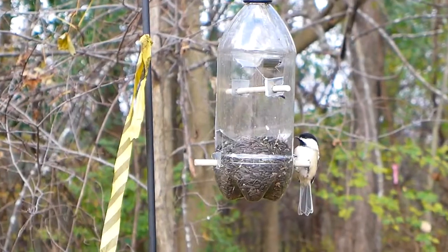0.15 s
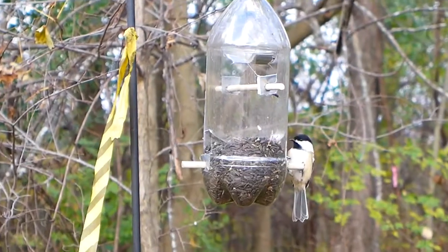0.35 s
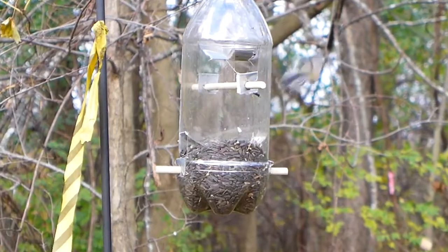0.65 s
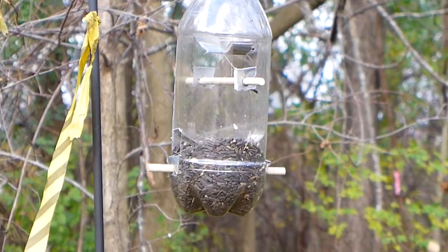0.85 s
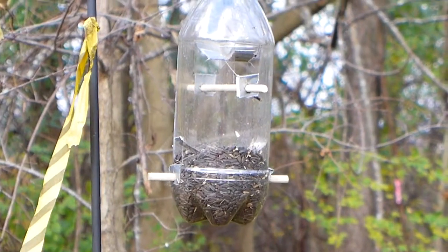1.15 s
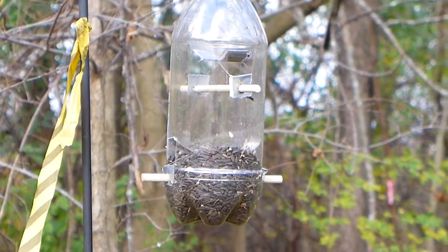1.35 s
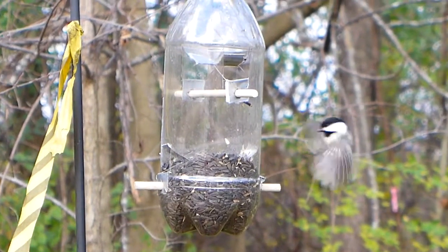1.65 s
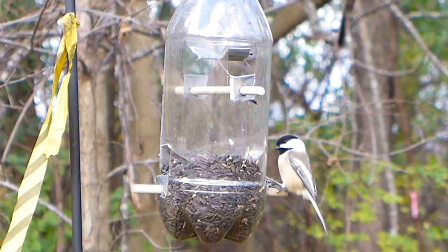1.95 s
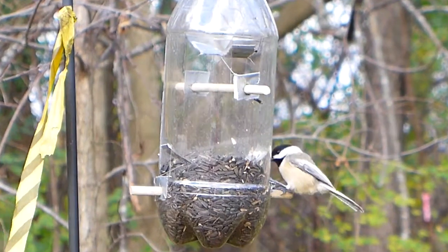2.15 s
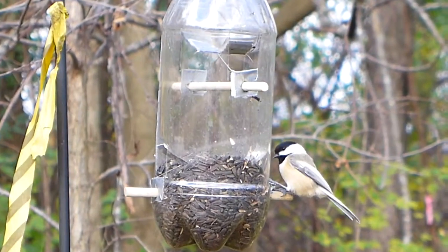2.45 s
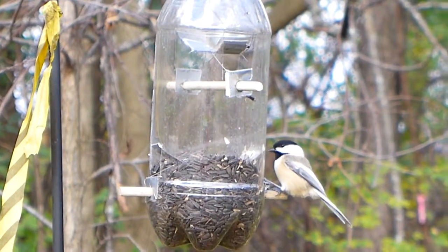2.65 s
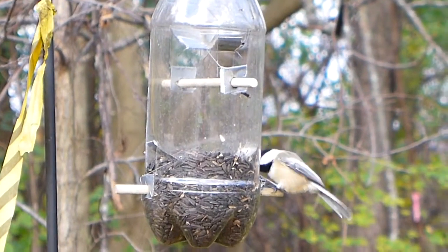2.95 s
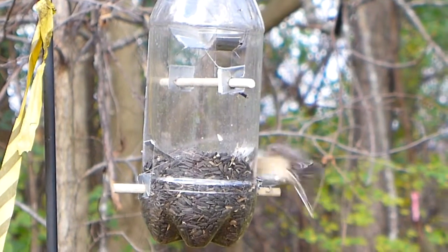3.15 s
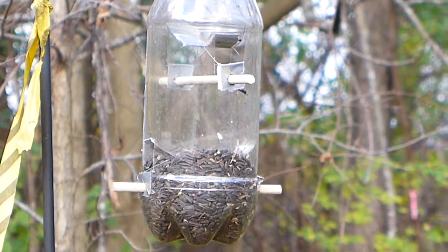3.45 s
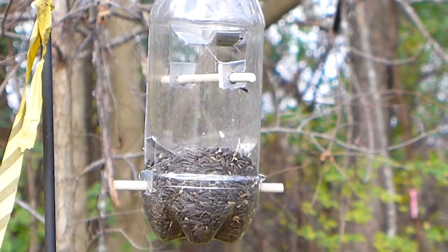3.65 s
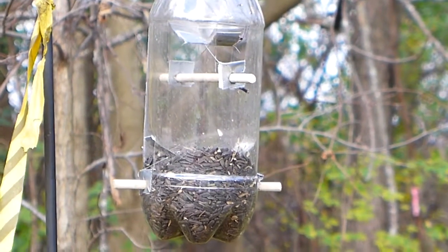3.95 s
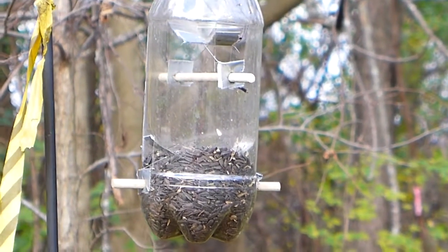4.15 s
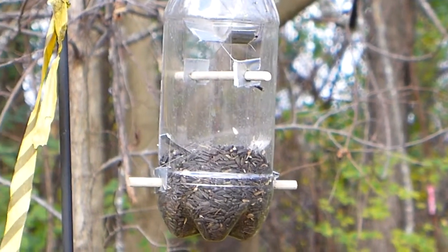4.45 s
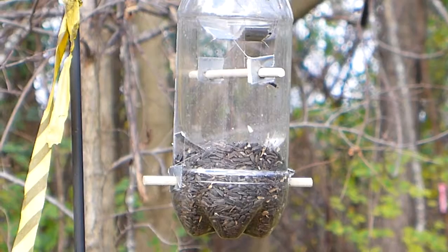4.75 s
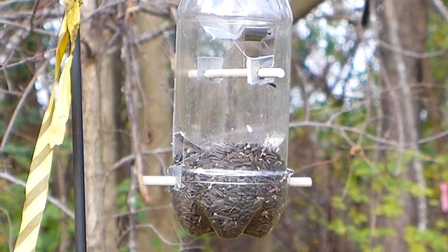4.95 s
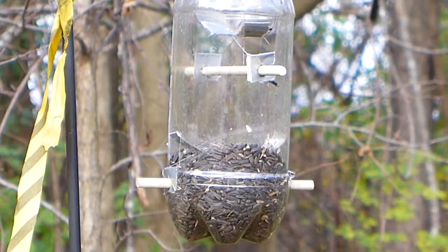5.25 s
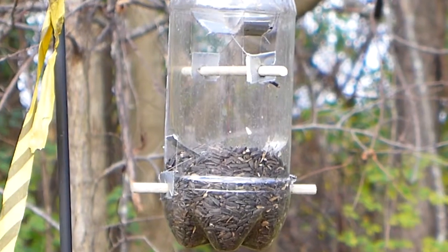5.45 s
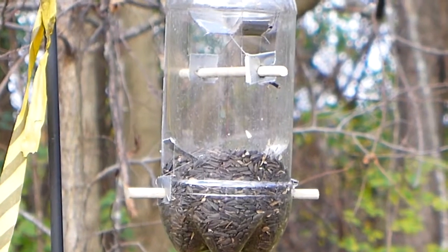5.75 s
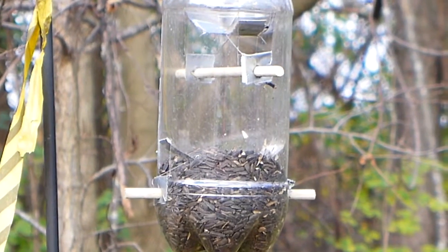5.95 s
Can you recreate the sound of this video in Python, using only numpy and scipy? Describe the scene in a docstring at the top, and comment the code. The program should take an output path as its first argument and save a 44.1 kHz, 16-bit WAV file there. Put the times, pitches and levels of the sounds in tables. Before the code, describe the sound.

Small birds whistle, chirp and rasp at a woodland feeder while the seed-filled bottle knocks and clicks over a faint, wavering outdoor hum and hiss.

```python
"""Chickadees at a hanging feeder

Chickadees call at a wood's edge: thin and arched whistles and two-voiced buzzes are gliding near sines,
harsh dees are harmonic stacks roughened by noise. A further bird's nasal note is a stack too.
Far caws are noise-shaken tones, feeder knocks are decaying modes with noise, rustles are grainy noise.
Trees scatter the calls back over drifting noise: a distant town hum and the hiss of a small camera."""
import sys
import numpy as np
from scipy import signal
from scipy.fft import rfft, irfft
from scipy.io import wavfile
from scipy.ndimage import uniform_filter1d

SR = 44100
rng = np.random.default_rng(int(sys.argv[2]) if len(sys.argv) > 2 else 0)


def master_out(mix):
    """Clip the mix to full scale and print it as 16-bit PCM to the path in sys.argv[1]."""
    frames = np.transpose(np.atleast_2d(mix))
    ceiling = np.clip(frames, -1, 1)
    pcm = np.round(ceiling * 32767).astype(np.int16)
    wavfile.write(sys.argv[1], SR, pcm)


N = 269010  # samples


def undb(db):
    """Decibels to gain."""
    return 10 ** (np.asarray(db) / 20)


def level(x, db):
    """Scale to an rms level."""
    return x * undb(db) / np.sqrt(np.mean(x ** 2))


def read(points, hz):
    """Read a (pitch_hz, level_db) table on a log-frequency axis."""
    f, db = np.transpose(points)
    return np.interp(np.log(np.maximum(hz, 1)), np.log(f), db)


def walk(rate, size=N):
    """Smooth random motion with about rate turns a second; spread near 1."""
    k = max(int(SR / rate), 1)
    twice_smoothed = uniform_filter1d(uniform_filter1d(rng.standard_normal(size), k), k)
    return np.sqrt(1.66 * k) * twice_smoothed


def coloured(gain):
    """Noise whose spectrum is gain(Hz)."""
    hz = np.arange(N // 2 + 1) * SR / N
    return irfft(rfft(rng.standard_normal(N)) * gain(hz), N)


def bright_noise(size):
    """Noise between 4 and 11 kHz, for breath and cracks."""
    band = signal.butter(2, [4000, 11000], "bandpass", fs=SR, output="sos")
    return signal.sosfilt(band, rng.standard_normal(size))


def fading(t, t60):
    """Exponential decay by 60 dB in t60 seconds."""
    return np.exp(-np.log(1000) * t / t60)


def unroll(table):
    """The samples that a note covers, and its columns joined by straight lines."""
    s, *columns = np.transpose(table)
    at = np.arange(int(s[0] * SR), min(int(s[-1] * SR), N))
    return at, [np.interp(at / SR, s, c) for c in columns]


def clock(length):
    """Half-millisecond steps through a note."""
    return np.arange(0, length, .0005)


def air():
    """Town hum and hiss: noise in octave bands that drift alone, plus a few wavering hum bands."""
    # spectrum of the air before overall scaling: pitch_hz [Hz], density_db [relative dB per Hz]
    air_colour = [(15, -63), (25, -12), (43, -22.5), (154, -11), (181, -6), (462, -2.5), (501, -6.5),
                  (573, -2.5), (729, -8.5), (1060, -9.5), (1460, -19.5), (1960, -20.5), (3260, -27.5),
                  (4150, -23), (15000, -26.5)]
    # stereo spread of the air: pitch_hz [Hz], side_minus_mid_db [dB]
    air_width = [(60, -13.5), (110, -15.5), (200, -10.5), (380, -10.5), (700, -4), (1290, 3.5), (2380, 3),
                 (4400, -0.5), (8120, -2.5), (15000, -3)]
    # hum bands: centre_hz [Hz], width_hz [Hz], level_db [dB rms before wavering]
    hum_bands = [(567.5, 34, -71), (682.5, 29, -66.5), (1047, 58, -67.5), (193.5, 66, -74.5),
                 (1357, 22, -78.5)]
    out = 0
    for centre_hz in 22 * 2. ** np.arange(10):
        # neighbouring octaves crossfade
        share = lambda hz: np.cos(np.pi / 2 * np.clip(np.log2(np.maximum(hz, 1) / centre_hz), -1, 1))
        mid = coloured(lambda hz: share(hz) * undb(read(air_colour, hz)))
        side = coloured(lambda hz: share(hz) * undb(read(air_colour, hz) + read(air_width, hz)))
        # the treble drifts less
        drift_db = (2.3 * walk(3.4) + 1.5 * walk(20)) * min(1, 800 / centre_hz) ** 0.45
        out = out + undb(drift_db) * np.array([mid + side, mid - side])
    out = level(out, -53)
    for f, width, db in hum_bands:
        hum = level(coloured(lambda hz: 1 / (1 + ((hz - f) / width * 2) ** 2)), db)
        out += hum * undb(3.25 * walk(11.3))
    return out


def crow():
    """Distance smears each caw into a rough band: noise shakes a tone gliding in pitch and level."""
    # far caws: start_s [s], length_s [s], start_hz [Hz], middle_hz [Hz], end_hz [Hz], level_db [dB]
    caws = [(0.225, 0.39, 1522, 1600, 1556, -62.5), (1.012, 0.43, 1385, 1520, 1575, -60),
            (2.382, 0.67, 1554, 1542, 1536, -59.5), (3.648, .68, 1480, 1676, 1390, -59.5)]
    out = np.zeros(N)
    for s, length, start_hz, middle_hz, end_hz, db in caws:
        at, (hz, caw_db) = unroll([(s, start_hz, db - 5.5), (s + 0.27 * length, middle_hz, db),
                                   (s + length, end_hz, db - 6.5)])
        tone = np.sin(2 * np.pi * np.cumsum(hz) / SR)
        edge = np.hanning(len(at)) ** 0.082
        out[at] = undb(caw_db) * edge * walk(342, size=len(at)) * tone
    return out


def stacks(notes, throat, jitter, blur_hz, focus_hz, focus_width):
    """Harmonics through a throat and a beak resonance; roughness turns each line into a noisy band."""
    out = np.zeros(N)
    for note in notes:
        at, (hz, db, rough, focus_db) = unroll(note)
        pitch = uniform_filter1d(hz, size=600) * (1 + jitter * walk(60, size=len(at)))
        phase = 2 * np.pi * np.cumsum(pitch) / SR
        voice = 0
        for k in range(2, 24):
            noisy = np.clip(rough * (k / 8) ** 0.77, 0, 1)  # upper lines blur more
            shake = np.sqrt(1 - noisy) + np.sqrt(noisy) * walk(blur_hz, size=len(at))
            beak_db = focus_db * np.exp(-((k * hz - focus_hz) / focus_width) ** 2)
            # each line waxes and wanes alone
            gain_db = read(throat, k * hz) + beak_db + 1.5 * walk(30, size=len(at))
            line = np.sin(k * phase + rng.uniform(0, 2 * np.pi))
            voice = voice + undb(gain_db) * shake * line
        # even out the voice so that the note's own level curve rules
        out[at] += undb(db) * voice / np.sqrt(uniform_filter1d(voice ** 2, size=1500))
    return out


def nasal_note():
    """A further bird's nasal note: a pulsed stack of harmonics that swells and dies."""
    # points along each note: time_s [s], pulse_rate_hz [Hz], level_db [dB], roughness [0-1], beak_focus_db [dB]
    nasal_path = [
        [(0.51, 456, -67, 0.35, -7.5), (0.536, 482, -50, 0.5, 3), (0.554, 494, -46, 0.7, 5.5),
         (0.582, 472, -46, 0.5, 2), (0.6, 446, -54, 0.5, -2), (0.625, 454, -66, 0.4, -6)],
    ]
    # throat response: pitch_hz [Hz], level_db [dB]
    nasal_throat = [(710, -64.5), (1200, -13), (1950, -3), (2200, -4.5), (2930, -7.5), (4000, -25),
                    (5200, -35), (8800, -120)]
    return stacks(nasal_path, nasal_throat, jitter=0.0033, blur_hz=310, focus_hz=2800, focus_width=240)


def feeder(ring_t60, rattle_db, rattle_t60, crack_t60):
    """Each knock rings the loaded bottle's main and upper modes, rattles the seed, and cracks."""
    # knocks: start_s [s], ring_db [dB], ring_hz [Hz], crack_db [dB], left_minus_right_db [dB]
    knock_table = [(0.557, -38.5, 720, -36, 0), (0.876, -40, 490, -51, -8), (1.44, -21, 387, -35.5, -5.5),
                   (1.481, -45, 626, -37.5, -10), (1.592, -57, 454, -45, 3), (1.659, -40, 356, -64.5, -2),
                   (1.798, -40, 510, -49, 0), (2.292, -46.5, 665, -53, -1), (3.163, -25, 647, -35, -1.5),
                   (3.221, -42, 2300, -44.5, -1), (3.246, -47, 810, -38, 4),
                   (3.255, -34, 2130, -36.5, -3.5), (3.655, -50, 223, -51, -2), (4.641, -54, 252, -62, -2),
                   (4.939, -25.5, 376, -44, -5), (5.05, -33.5, 360, -56, -5.5), (6.051, -53, 995, -43, -2)]
    # upper modes of the bottle: pitch_hz [Hz], level_db [dB against the main ring], t60_s [s]
    upper_modes = [(1220, -14.5, 0.013), (2110, -16.5, 0.025), (4970, -14, 0.017)]
    out, t = np.zeros((2, N + SR // 10)), np.arange(SR // 10) / SR
    upper = sum(undb(db) * np.sin(2 * np.pi * hz * t) * fading(t, t60) for hz, db, t60 in upper_modes)
    for s, db, hz, crack_db, pan_db in knock_table:
        ring = np.sin(2 * np.pi * hz * t) * fading(t, ring_t60)
        rattle = undb(rattle_db) * walk(3500, size=len(t)) * fading(t, rattle_t60)
        crack = undb(crack_db) * bright_noise(len(t)) * fading(t, crack_t60)
        knock = undb(db) * (ring + upper + rattle) + crack
        start = int(s * SR)
        out[:, start:start + len(t)] += knock * undb([[pan_db / 2], [-pan_db / 2]])
    # the camera passes little deep bass from the knocks
    return signal.sosfilt(signal.butter(4, 140, "highpass", fs=SR, output="sos"), out[:, :N])


def whistles(notes, overtone_db, overtone_fall_db, flutter, flutter_hz, breath, hiss_db, octave_blur):
    """Near sines, the octave fading as pitch climbs; level beats and pitch wavers; breath blurs them."""
    out = np.zeros(N)
    air_jet = bright_noise(N)
    for note in notes:
        at, (hz, db) = unroll(note)
        edge = np.clip(np.minimum(at - at[0], at[-1] - at) / (0.00064 * SR), 0, 1)
        phase = 2 * np.pi * np.cumsum(uniform_filter1d(hz, size=40)) / SR
        flutter_phase = 2 * np.pi * np.cumsum(flutter_hz * (1 + .12 * walk(130, size=len(at)))) / SR
        phase = phase + 2.0 * flutter * np.cos(flutter_phase)  # the pitch wavers in step with the level
        beat = 1 + flutter * np.sin(flutter_phase) + breath * walk(5000, size=len(at))
        octave_gain = undb(overtone_db - overtone_fall_db * np.log2(hz / 5000))
        octave = octave_gain * np.sin(2 * phase) * (1 + octave_blur * walk(1500, size=len(at)))
        tone = np.sqrt(2) * undb(db) * beat * (np.sin(phase) + octave)
        # the jet of breath swells less than the tone
        hiss = undb(hiss_db + 0.37 * db) * air_jet[at]
        out[at] += edge * (tone + hiss)
    return out


def seet(s, length, start_hz, held_hz, end_hz, glide, droop, early_db, mid_db, late_db):
    """The pitch glides to its held value and droops ever faster at the end."""
    attack_s, release_s, edge_db, shoulder_db = 0.011, 0.0043, -15, -5.5
    t = clock(length)
    pitch = held_hz - (held_hz - start_hz) * np.exp(-t / glide)
    pitch = pitch - (held_hz - end_hz) * np.maximum(1 - (length - t) / droop, 0) ** 2
    marks = [0, attack_s, .27 * length, length / 2, 0.84 * length, length - release_s, length]
    db = np.interp(t, marks, [early_db + edge_db, early_db + shoulder_db, early_db, mid_db,
                              late_db, late_db + shoulder_db, late_db + edge_db])
    return np.c_[s + t, pitch, db]


def seets():
    """Thin, nearly pure whistles with little flutter or breath."""
    # seet notes: start_s [s], length_s [s], start_hz [Hz], held_hz [Hz], end_hz [Hz], glide_s [s],
    # droop_s [s], early_db [dB], midway_db [dB], late_db [dB]
    seet_table = [(0.56, 0.057, 5600, 8440, 3400, .0095, 0.014, -29.5, -35, -27),
                  (0.583, 0.031, 6700, 6400, 6200, .008, 0.0083, -34, -40, -30),
                  (2.659, 0.072, 7830, 8760, 7700, .009, .024, -34, -31, -44),
                  (2.665, 0.069, 7400, 7150, 5700, 0.013, 0.05, -45, -30.5, -34),
                  (4.918, 0.0542, 6360, 7200, 6900, 0.011, 0.022, -53, -58, -55),
                  (5.011, 0.11, 7550, 9027, 8810, 0.015, 0.008, -34, -30, -33),
                  (5.036, 0.048, 7700, 7740, 7600, .01, .015, -43, -53.5, -48)]
    return whistles([seet(*c) for c in seet_table], overtone_db=-27, overtone_fall_db=32, flutter=.04,
                    flutter_hz=300, breath=.03, hiss_db=-52, octave_blur=1.2)


def chirp(s, held, hz, ease_hz, octave_s, early_db, mid_db, late_db):
    """The pitch leaps, eases up to its top, then plunges; the beak favours the top."""
    # low pitches leave the beak weakly: pitch_hz [Hz], level_db [dB]
    beak = [(2000, -32), (3100, -28), (4200, -17), (5200, -5.5), (6400, -3)]
    foot_hz, rise_s, ease_s, early_s, start_db = 3050, .0025, .012, .011, -11
    t = clock(held + .02)
    climb = hz - ease_hz * np.exp(-t / ease_s) - (hz - ease_hz - foot_hz) * np.exp(-t / rise_s)
    plunge = 2 ** (-np.maximum(t - held, 0) / octave_s)
    pitch = uniform_filter1d(climb * plunge, size=8, mode="nearest")
    effort_db = np.interp(t, [0, early_s, (early_s + held) / 2, held],
                          [early_db + start_db, early_db, mid_db, late_db])
    sounding = (pitch > foot_hz) | (t < held)
    return np.c_[s + t, pitch, effort_db + read(beak, pitch)][sounding]


def chirps():
    """Arched whistles whose level beats quickly, with a blurred octave."""
    # chirps: start_s [s], time_until_drop_s [s], top_hz [Hz], slow_last_climb_hz [Hz],
    # octave_drop_s [s], early_db, midway_db, late_db [dB before the beak]
    chirp_table = [(0.668, 0.037, 7970, 2720, 0.0047, -17, -21.5, -21.5),
                   (0.758, 0.031, 7020, 811, 0.0089, -18, -18, -21.5),
                   (0.844, .030, 7440, 1677, 0.01, -16.5, -28, -19.5),
                   (0.941, .032, 7430, 1410, 0.0089, -16.5, -20.5, -20),
                   (1.032, .033, 7280, 1810, .008, -23, -21, -23),
                   (1.13, .035, 7190, 1870, 0.0073, -24.5, -22, -24)]
    return whistles([chirp(*c) for c in chirp_table], overtone_db=-16, overtone_fall_db=42, flutter=0.21,
                    flutter_hz=127.6, breath=0.091, hiss_db=-48, octave_blur=0.7)


def dee(s, length, top_hz, sag, db, rough, focus_db):
    """A rough start climbs and clears; then the rate sags as level, roughness and beak focus grow."""
    start_share, rise_s, droop_s, droop_hz = .76, .022, 0.0386, 25
    attack_s, settle_s, release_s, swell_db = 0.016, 0.033, .011, 3
    t = clock(length)
    rate = top_hz * (1 - (1 - start_share) * np.exp(-t / rise_s)) - sag * t
    rate -= droop_hz * np.maximum(1 - (length - t) / droop_s, 0) ** 2
    marks = [0, attack_s, settle_s, length - release_s, length]
    shape_db = np.interp(t, marks, [-22, -6.5, -swell_db / 2, swell_db / 2, -20])
    roughness = np.interp(t, marks[1:4], [.55, rough, rough + .18])
    focus = focus_db - 3 * np.maximum(1 - t / marks[3], 0)
    return np.c_[s + t, rate, db + shape_db, roughness, focus]


def dees():
    """Harsh notes: fast pulses heard as a stack of noisy harmonics."""
    # dee notes: start_s [s], length_s [s], top_pulse_rate_hz [Hz], sag_hz_per_s [Hz/s],
    # level_db [dB], roughness [0-1], beak_focus_db [dB]
    dee_table = [(1.269, 0.19, 522.3, 129.3, -39.5, 0.46, 8.5), (2.778, 0.17, 491, 189.5, -40, .2, 5),
                 (3.001, 0.19, 493.6, 152, -39.5, 0.19, 6.5), (3.231, 0.19, 511.4, 195.7, -41, 0.24, 4.5),
                 (5.841, .186, 525.5, 108.3, -34.5, 0.4, 7.5), (6.061, .19, 520, 110, -34, .35, 7.5)]
    # throat response: pitch_hz [Hz], level_db [dB]
    dee_throat = [(760, -39), (1300, -27.5), (1980, -14), (2570, -20.5), (2760, -11.5), (3240, -9),
                  (3500, -6.5), (4080, -4.5), (4970, -8), (5790, -15.5), (6580, -24), (10000, -34.5),
                  (13000, -35), (22000, -120)]
    return stacks([dee(*c) for c in dee_table], dee_throat, jitter=0.0035, blur_hz=640,
                  focus_hz=3850, focus_width=470)


def rustle():
    """Grainy broad noise of feathers and leaves, swelling and fading."""
    # rustles: loudest_s [s], rise_s [s], hold_s [s], level_db [dB], fade_db_per_s [dB/s]
    rustle_table = [(1.473, 0.022, .001, -56.5, 84.5), (2.286, .066, 0.0071, -54, 902),
                    (4.937, .004, 0.098, -58, 430)]
    # spectrum before scaling: pitch_hz [Hz], density_db [relative dB per Hz]
    rustle_colour = [(1500, -4), (5000, 12.5), (8000, 5.5), (11000, 8), (15000, -2)]
    range_db = 28.5
    out = np.zeros(N)
    grain = level(coloured(lambda hz: undb(read(rustle_colour, hz))), 2.3) * undb(1.2 * walk(200))
    for s, rise, hold, top_db, fade in rustle_table:
        low_db = top_db - range_db
        at, (db,) = unroll([(s - rise, low_db), (s, top_db), (s + hold, top_db),
                            (s + hold + range_db / fade, low_db)])
        out[at] = undb(db) * grain[at]
    return out


def rasp(s, creep, hold, start_hz, shelf_hz, top_hz, db):
    """Creeps up to a shelf while swelling, jumps to the top, holds, and stumbles out."""
    # the stumble: after_hold_s [s], share_of_top_pitch [ratio], level_db [dB against the top]
    stumble = [(.005, 1, -18), (.01, 1, -4), (.013, .88, -22), (.02, .82, -34)]
    top = s + creep + 0.0051  # the jump lasts 5.1 ms
    end = top + hold
    return [(s, start_hz, db - 25),
            (s + creep / 2, start_hz + 0.7 * (shelf_hz - start_hz), db - 7.5),
            (s + creep, shelf_hz, db - 1.5),
            (top, top_hz, db),
            (end, top_hz, db),
            *[(end + late, share * top_hz, db + tail_db) for late, share, tail_db in stumble]]


def rasps():
    """Rough voice of the buzzy notes: fast deep flutter and much breath."""
    # rasps: start_s [s], creep_s [s], hold_at_top_s [s], start_hz [Hz], shelf_hz [Hz], top_hz [Hz], level_db [dB]
    rasp_table = [(5.572, 0.014, 0.015, 4240, 5000, 7260, -27.5),
                  (5.658, .022, 0.0012, 3496, 5100, 6240, -27),
                  (5.748, 0.026, .001, 3813, 5010, 5740, -25.5)]
    return whistles([rasp(*c) for c in rasp_table], overtone_db=-43, overtone_fall_db=6, flutter=0.39,
                    flutter_hz=479.4, breath=0.32, hiss_db=-28, octave_blur=.7)


def sweep(s, hold, top_hz, db):
    """A peaked sweep up and down, louder the higher it is."""
    foot_hz, rise_s, fall_s, rise_bend, fall_bend, db_per_octave = 2092, 0.017, 0.014, 1.6, 3.4, 26.5
    t = clock(rise_s + hold + fall_s) - rise_s
    climb = np.clip(1 + t / rise_s, 0, 1) ** rise_bend
    fall = np.clip(1 - (t - hold) / fall_s, 0, 1) ** fall_bend
    pitch = foot_hz + (top_hz - foot_hz) * uniform_filter1d(climb * fall, size=6)
    return np.c_[s + t, pitch, db + db_per_octave * np.log2(pitch / top_hz)]


def sweeps():
    """Clear voice of the buzzy notes: light flutter and some breath."""
    # sweeps: crest_s [s], hold_before_drop_s [s], crest_hz [Hz], level_db [dB]
    sweep_table = [(5.599, 0.0098, 6410, -20), (5.689, 0.00097, 5950, -18.5), (5.783, 0.0019, 5273, -23)]
    return whistles([sweep(*c) for c in sweep_table], overtone_db=-20, overtone_fall_db=23.5, flutter=0.086,
                    flutter_hz=430, breath=0.15, hiss_db=-44.5, octave_blur=0.2)


def trees(x, wet_db, t60, late_db, late_t60):
    """Near trunks send back a quick scatter, the far wood a longer one; a different one to each side."""
    t = np.arange(SR // 2) / SR
    fade = fading(t, t60) + undb(late_db) * fading(t, late_t60)
    fade = fade * np.minimum(t / 0.0081, 1)  # the scatter builds up over 8.1 ms
    shared, own = rng.standard_normal(len(t)), rng.standard_normal((2, len(t)))
    echo = undb(wet_db) * fade * (shared + 0.708 * own) / np.sqrt(np.sum(fade ** 2))
    # leaves swallow the highest pitches
    echo = signal.sosfilt(signal.butter(1, 9000, fs=SR, output="sos"), echo)
    return x + signal.fftconvolve(x[None], echo, axes=1)[:, :N]


def scene():
    """Birds through the trees, a little to the right with caws and rustles, over the feeder and the air."""
    thin = seets() + chirps() + rasps() + sweeps()
    harsh = nasal_note() + dees()
    heard = trees(thin, wet_db=-7.5, t60=0.031, late_db=-12.0, late_t60=0.3)
    heard += trees(harsh, wet_db=-9, t60=.1, late_db=-15.5, late_t60=0.4)
    heard += crow() + rustle()
    knocks = feeder(ring_t60=0.02, rattle_db=-9.5, rattle_t60=0.023, crack_t60=0.014)
    # left and right gains in dB
    return heard * undb([[-.7], [.7]]) + knocks + air() * undb([[-.4], [.4]])


def record(dry):
    """The camera dulls and then cuts the top, and sits slightly off zero."""
    top_hz, offset = 15600, -.003
    dull = signal.sosfilt(signal.butter(2, 14000, fs=SR, output="sos"), dry)
    return signal.sosfilt(signal.ellip(10, .2, 60, top_hz, fs=SR, output="sos"), dull) + offset


dry = scene()
out = record(dry)
master_out(out)
```